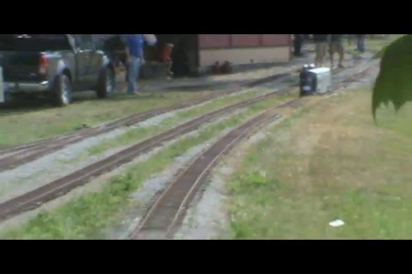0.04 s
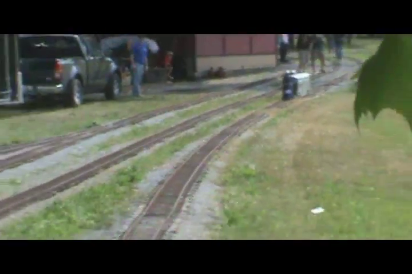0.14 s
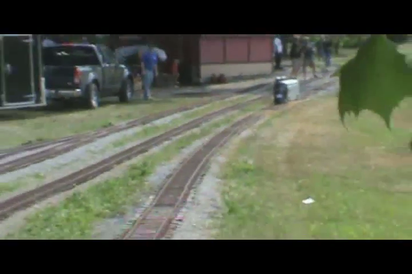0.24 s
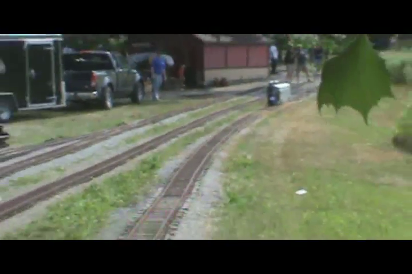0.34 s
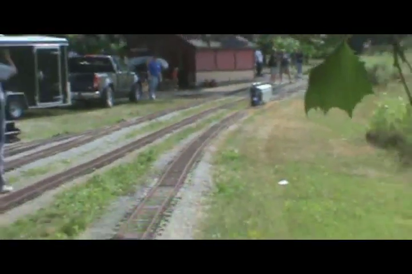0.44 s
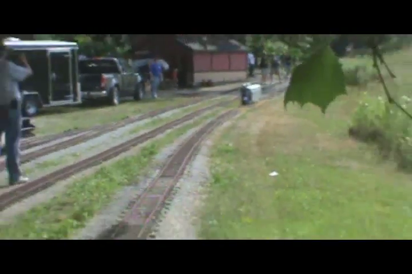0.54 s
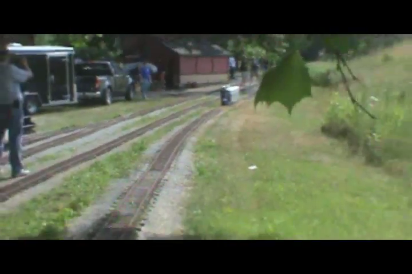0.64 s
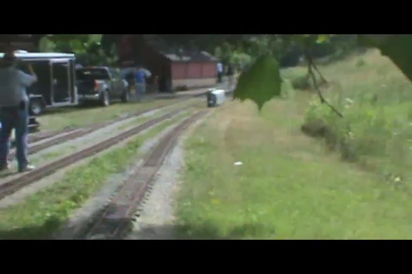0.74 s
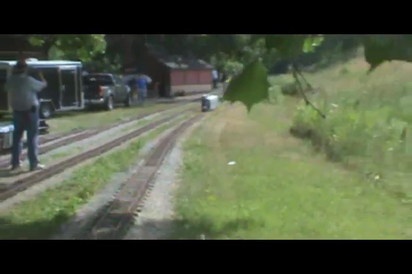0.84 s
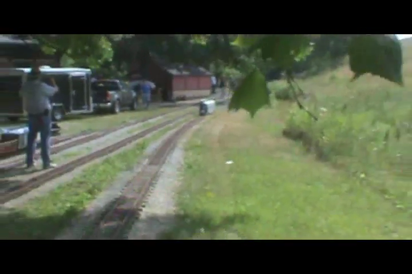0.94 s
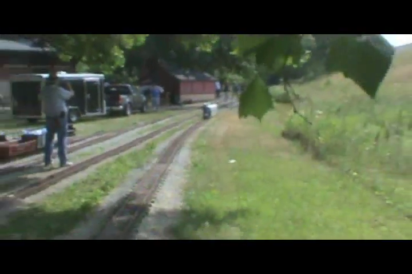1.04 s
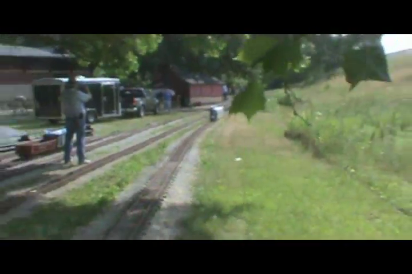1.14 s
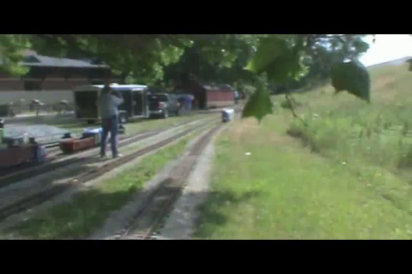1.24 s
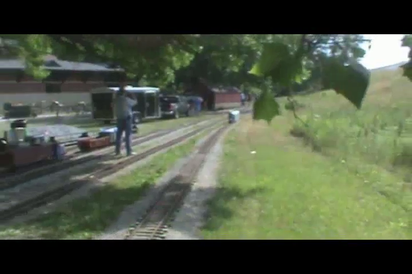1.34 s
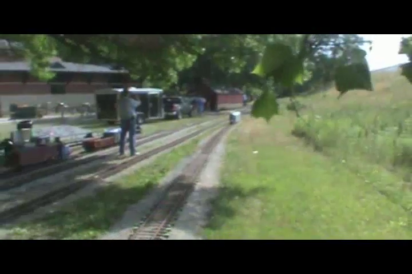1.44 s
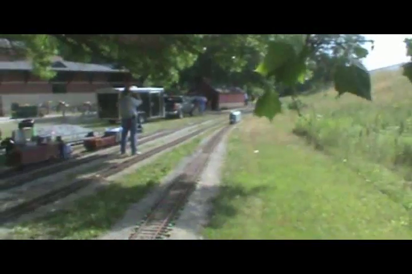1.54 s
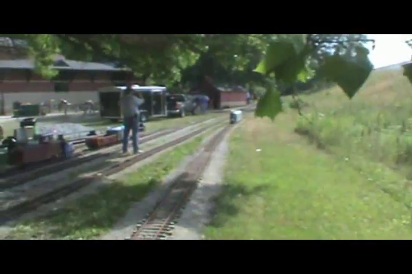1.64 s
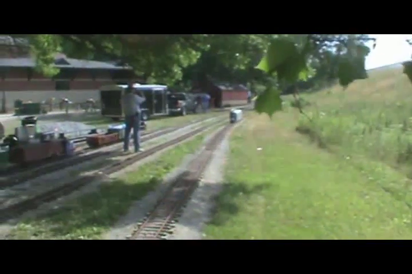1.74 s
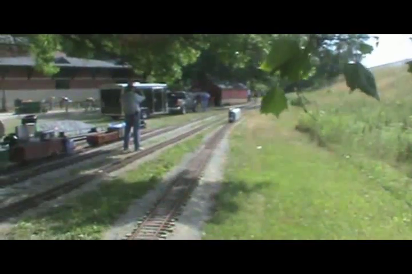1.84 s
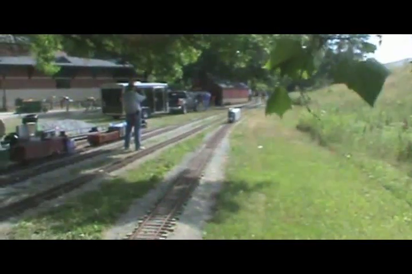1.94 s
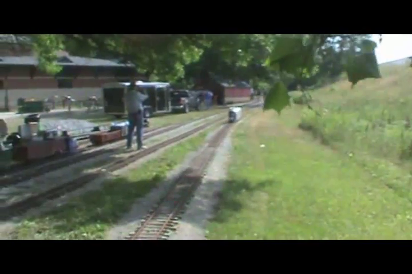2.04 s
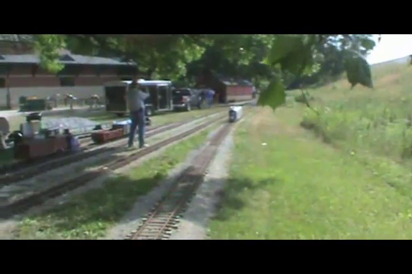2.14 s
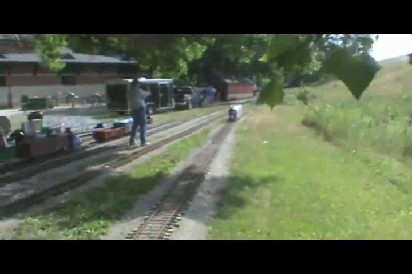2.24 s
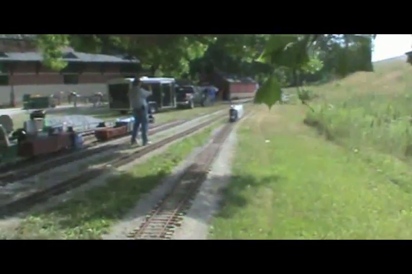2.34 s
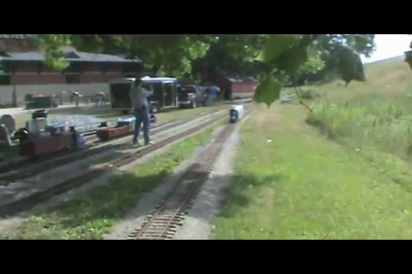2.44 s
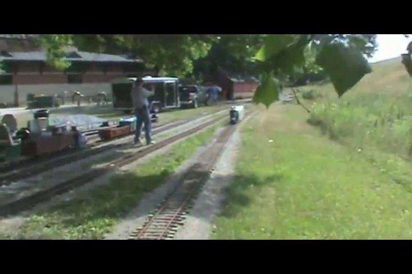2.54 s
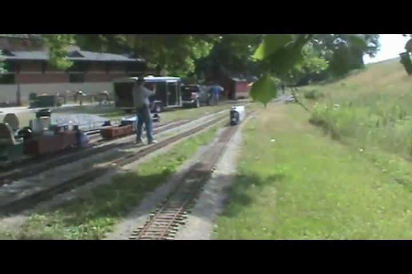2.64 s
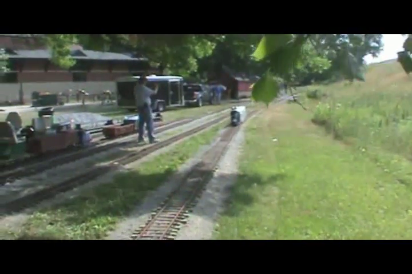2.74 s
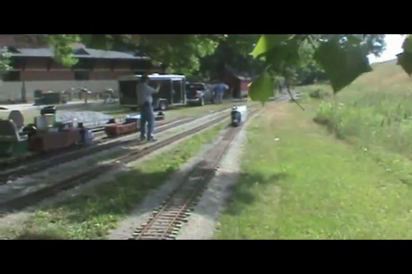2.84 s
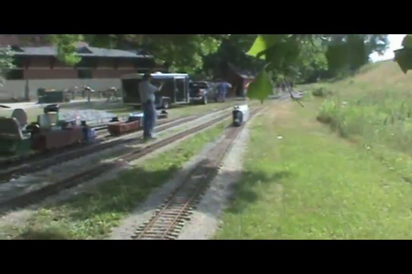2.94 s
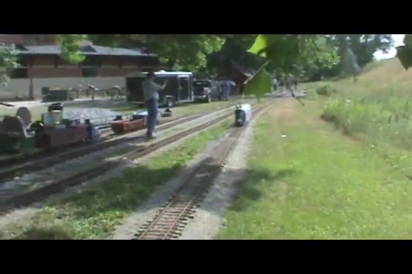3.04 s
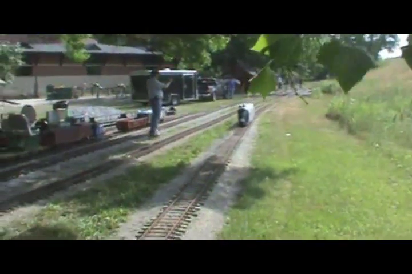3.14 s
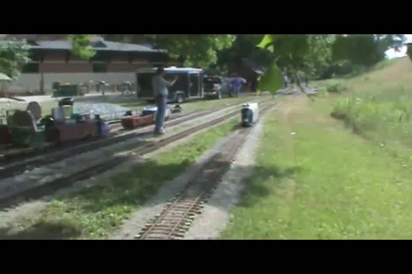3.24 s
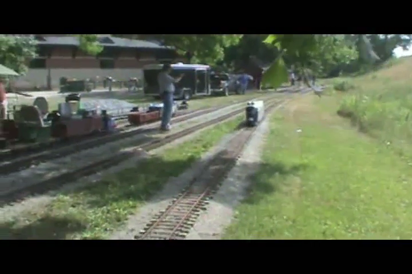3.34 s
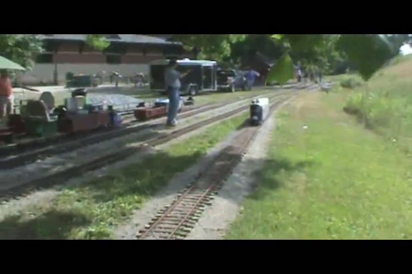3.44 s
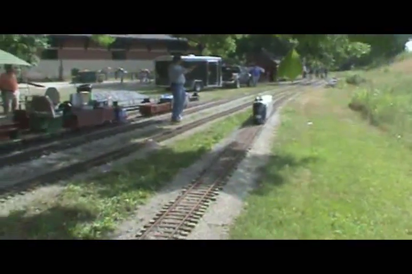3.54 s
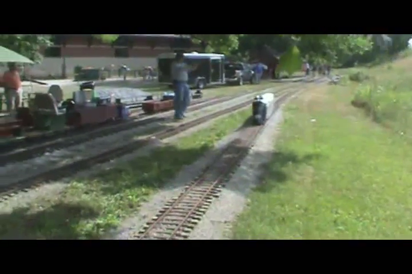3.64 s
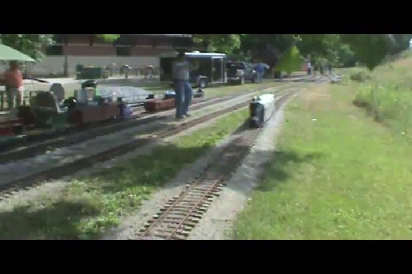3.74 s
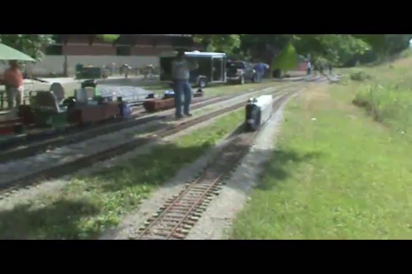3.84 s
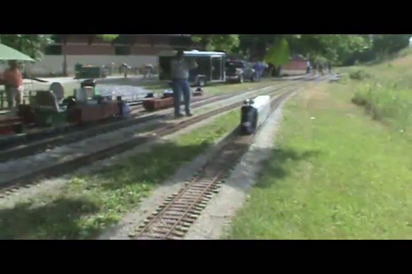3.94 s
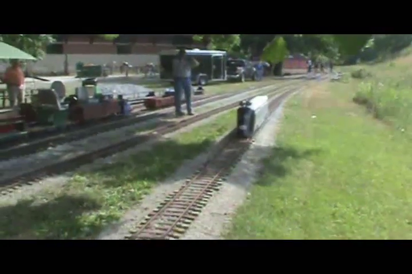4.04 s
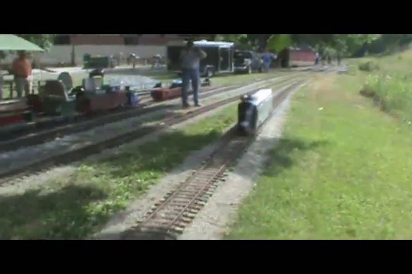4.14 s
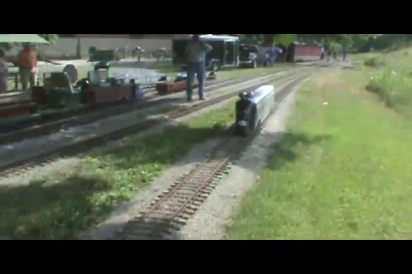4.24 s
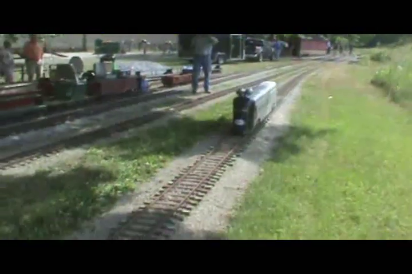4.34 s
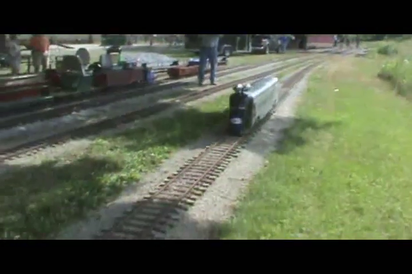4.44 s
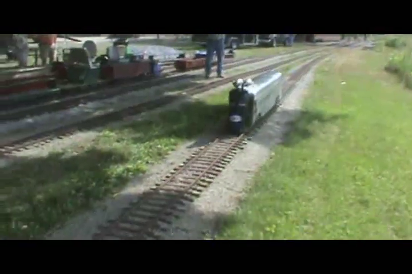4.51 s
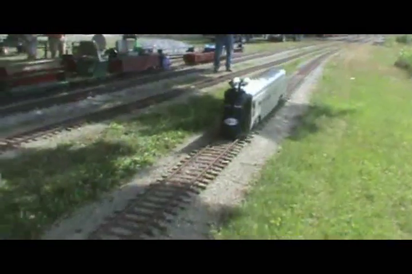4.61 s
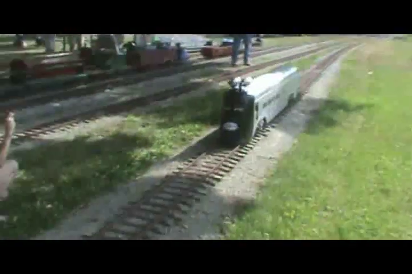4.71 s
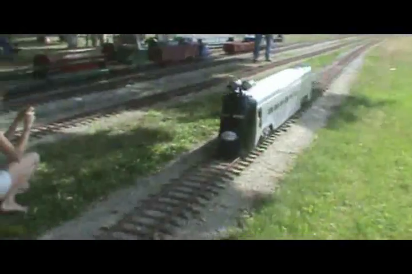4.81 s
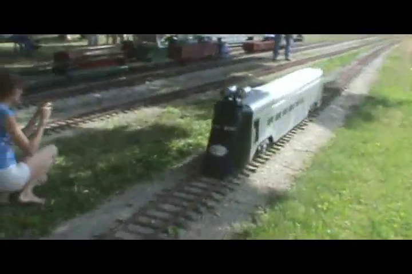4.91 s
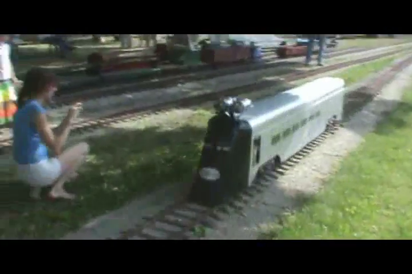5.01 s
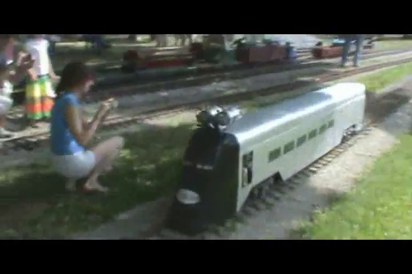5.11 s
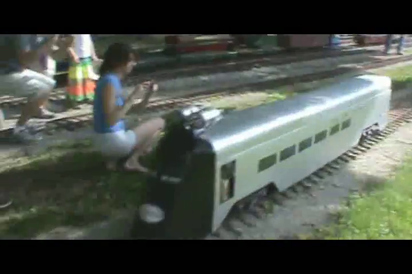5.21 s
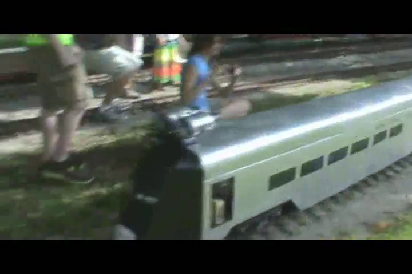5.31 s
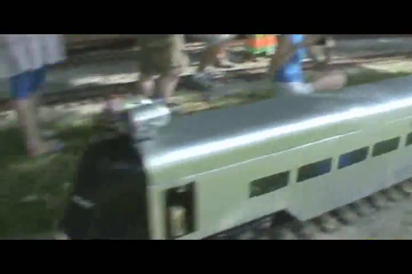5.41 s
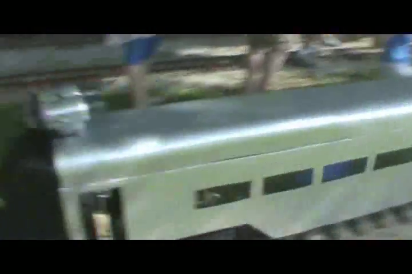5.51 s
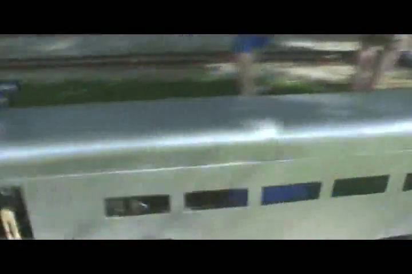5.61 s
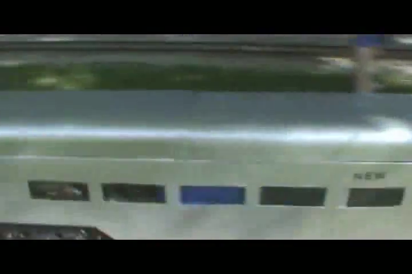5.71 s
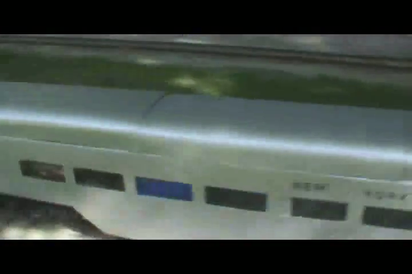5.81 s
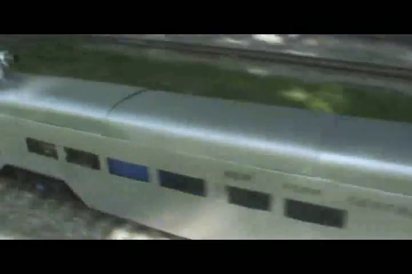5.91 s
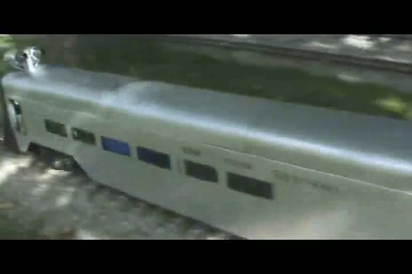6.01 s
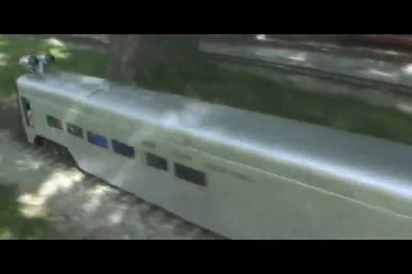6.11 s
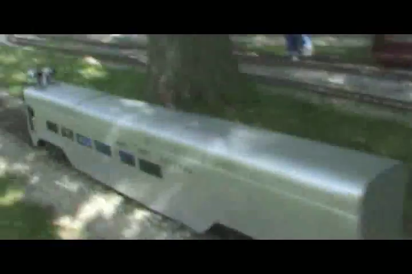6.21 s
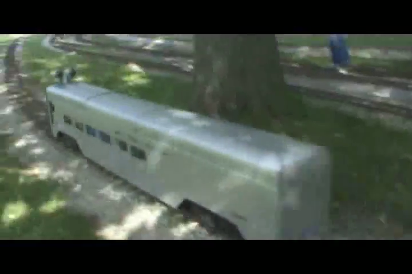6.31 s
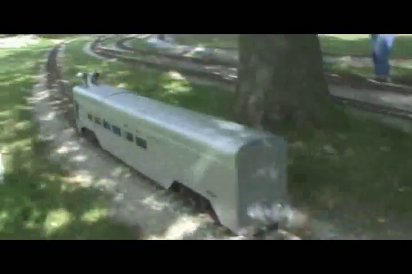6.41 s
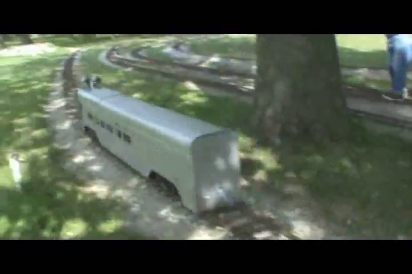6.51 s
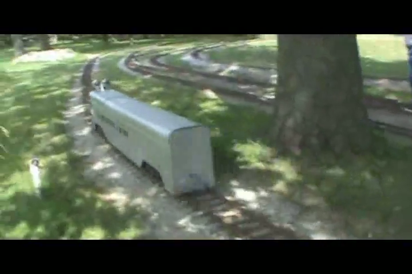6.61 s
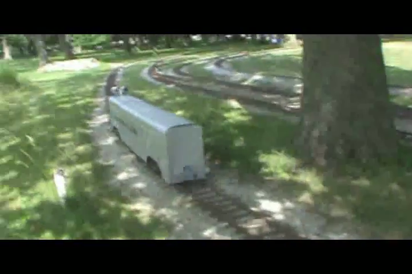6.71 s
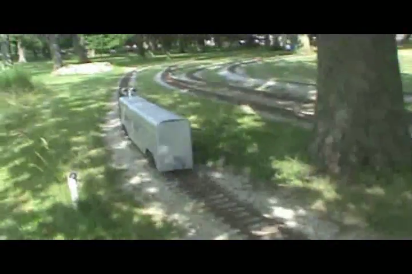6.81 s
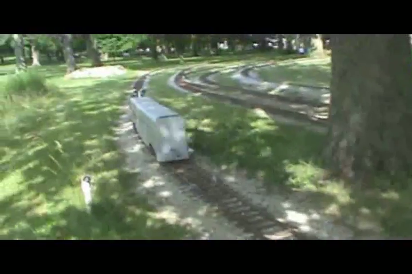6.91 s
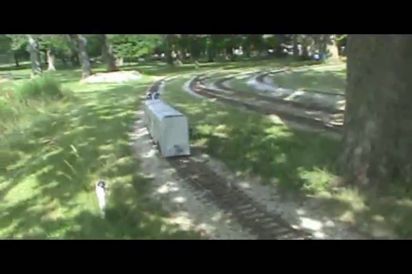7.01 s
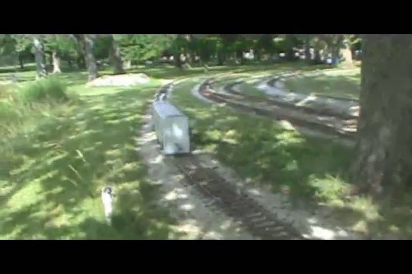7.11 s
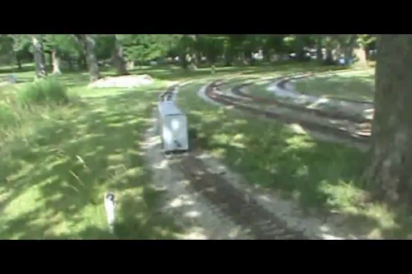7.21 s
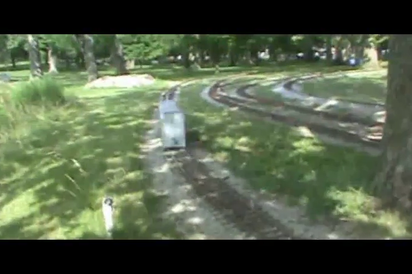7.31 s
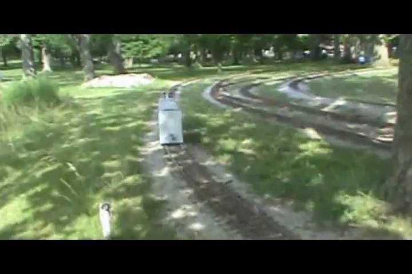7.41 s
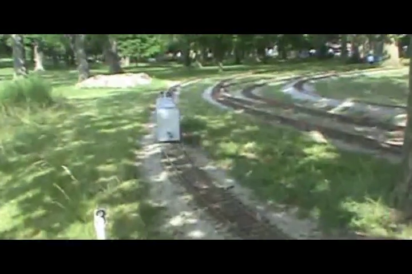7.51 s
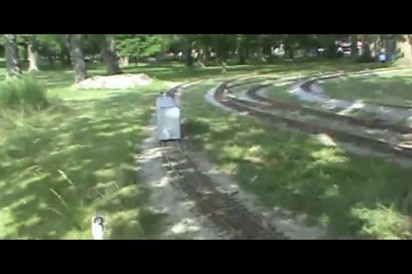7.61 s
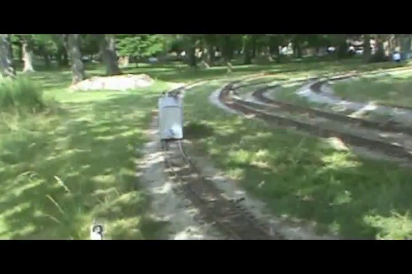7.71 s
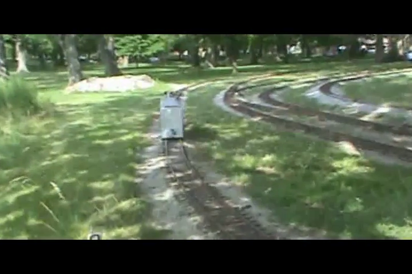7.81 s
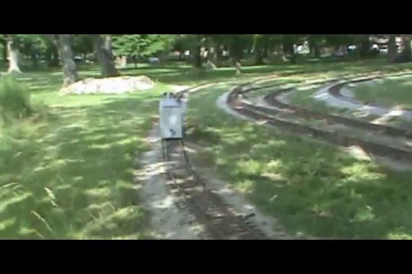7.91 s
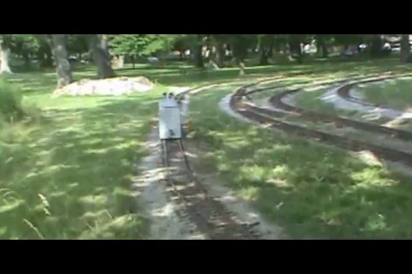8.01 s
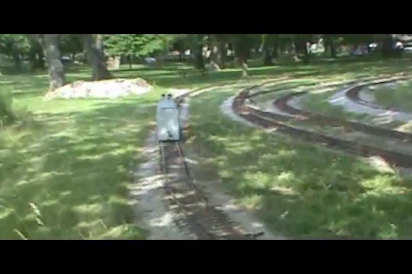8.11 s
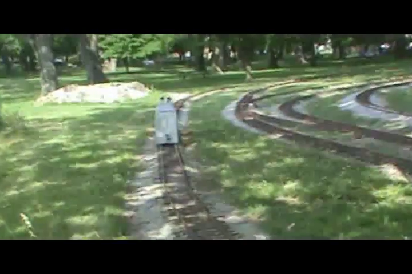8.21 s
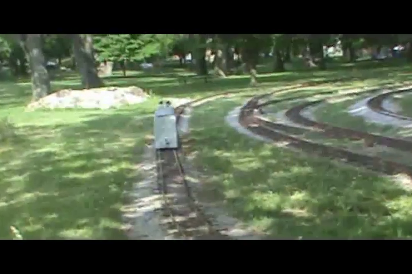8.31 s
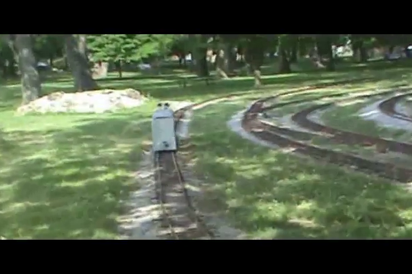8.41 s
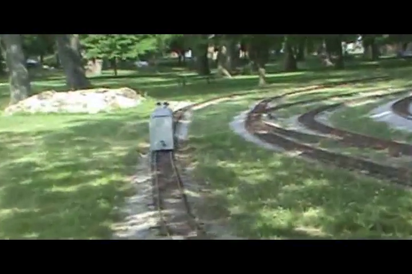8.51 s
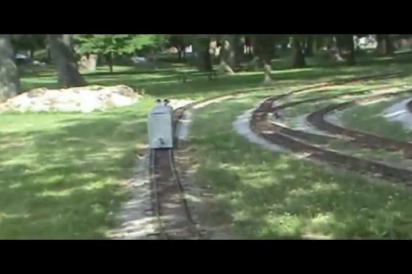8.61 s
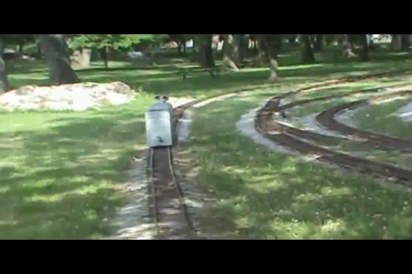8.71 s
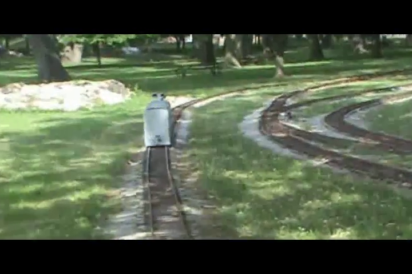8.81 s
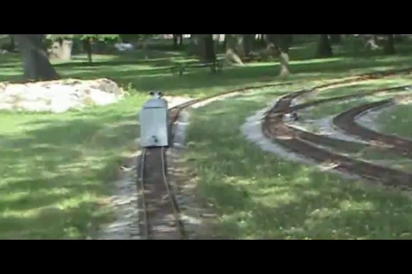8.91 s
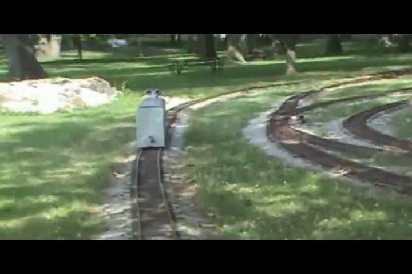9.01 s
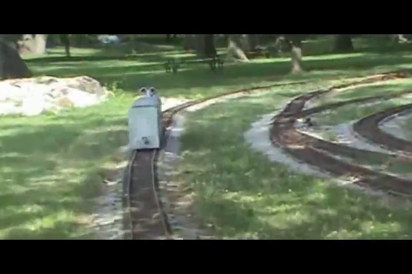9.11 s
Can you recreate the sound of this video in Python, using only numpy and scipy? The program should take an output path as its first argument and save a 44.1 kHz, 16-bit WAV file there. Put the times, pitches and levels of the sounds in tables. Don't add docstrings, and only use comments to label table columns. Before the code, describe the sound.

Outdoors in a park, a handheld stereo microphone catches a small jet-powered model train. From 0 s two piercing whines around 8.4 kHz waver and beat, with bright gritty hiss, a narrow hollow howl near half their pitch, and fluttering treble. Low wind gusts thump the microphone, strongest from 0.5 to 1 s, with scattered puffs until about 4 s. The howl and airy rush swell near 2 s; tree echoes blur the whine. From 4.5 s the train closes in, wind nearly gone. A dull wheel knock comes at 5.5 s; at about 5.9 s the rush is loudest, treble to the left, with a low body boom and a downward-sliding whoosh as the whine drops slightly. After 6.3 s it darkens to breathy tail rush and hoot, fading steadily. Small rail knocks sound near 7.1, 7.4 and 8.9 s over faint low murmur, until 9.15 s.

```python
import sys
import numpy as np
from scipy import signal
from scipy.fft import rfft, irfft, next_fast_len
from scipy.io import wavfile
from scipy.ndimage import uniform_filter1d, map_coordinates

SR = 44100
rng = np.random.default_rng(int(sys.argv[2]) if len(sys.argv) > 2 else 0)


def how_loud(loudness_db):
    steps = np.asarray(loudness_db, float) / 20
    return 10 ** steps


def file_out(sig):
    cols = np.atleast_2d(sig).T
    lim = np.clip(cols, -1, 1)
    pcm = np.round(lim * 32767).astype(np.int16)
    wavfile.write(sys.argv[1], SR, pcm)


N = 403515


def unit(x):
    return x / np.sqrt(np.mean(np.abs(x) ** 2) + 1e-20)


def seconds():
    return np.arange(N) / SR


def along(points, hz):
    f, v = np.transpose(points)
    return np.interp(np.log(hz + 1), np.log(f + 1), v)


def curves(rows):
    s, *cols = np.transpose(rows)
    return [np.interp(seconds(), s, c) for c in cols]


def wobble(rate_hz):
    at = np.arange(0, N + 64, 64)
    knots = rng.standard_normal(int(N * rate_hz / SR) + 4)
    return np.interp(np.arange(N), at, map_coordinates(knots, [at * rate_hz / SR]))


def bump(centre_s, half_s):
    return np.exp(-((seconds() - centre_s) / half_s) ** 2)


def filtered(x, response):
    m = next_fast_len(N + 8192)
    return irfft(rfft(x, m) * response(np.fft.rfftfreq(m, 1 / SR)), m)[..., :N]


def cycles(hz):
    return np.exp(2j * np.pi * np.cumsum(hz) / SR)


def band(width_hz, order):
    place = np.cumsum(width_hz) / SR * 8
    size = int(place[-1]) + 8
    shape = 1 / np.sqrt(1 + (np.fft.fftfreq(size) * 16) ** order)
    noise = rng.standard_normal((2, size)) + 1j * rng.standard_normal((2, size))
    seeds = np.fft.ifft(shape * noise)
    return unit(np.array([np.interp(place, np.arange(size), s) for s in seeds]))


def stereo(pair, alike):
    turn = np.arccos(np.clip(alike, -1, 1)) / 2
    mid, side = np.cos(turn) * pair[0], np.sin(turn) * pair[1]
    return np.array([mid + side, mid - side])


def sides(pan_db):
    g = how_loud(np.array([pan_db / 2, -pan_db / 2]))
    return g / np.sqrt(np.mean(g ** 2, axis=0))


# start_s, heading (0 nose, 1 flank, 2 tail), treble_left_right_db
PATH = [(0, 0.12, 0.5), (2, 0, 0.5), (3.3, 0.27, 0.5), (4.5, 0.15, -1.5), (5.2, 0.31, -2.5), (5.5, .8, 1.5),
        (5.8, 1, 10), (6.2, 0.93, 5), (6.65, 1.25, 2.5), (7, 1.903, 0.5), (9.15, 2.05, -1.5)]


def path():
    return curves(PATH)


# start_s, pitch_hz
UPPER = [(0, 8535), (.29, 8588), (.55, 8540), (1.3, 8390), (1.42, 8412), (2.1, 8506), (2.3, 8558),
         (2.72, 8622), (2.97, 8572), (3.28, 8445), (3.55, 8412), (4.0, 8473), (4.52, 8567), (4.9, 8500),
         (5.3, 8375), (5.9, 8268), (6.0, 8293)]
LOWER = [(1.2, 8398), (1.52, 8352), (2.02, 8480), (2.42, 8549), (2.73, 8552), (3.2, 8447), (3.82, 8340),
         (4.02, 8372), (4.47, 8495), (4.78, 8468), (5.27, 8372), (5.72, 8226), (5.92, 8224), (6.36, 8312),
         (7.4, 8115), (7.8, 8070), (8.5, 8266), (9.15, 8192)]
EARLY = [(0, 8421), (.42, 8483), (.55, 8448), (.85, 8302), (1.1, 8255)]
SPOOL_S = .06


def spool(rows):
    return uniform_filter1d(curves(rows)[0], size=round(SPOOL_S * SR), mode="nearest")


# start_s, exhaust_roar_db (nearness), intake_hiss_db
JET = [(0, -43, -30), (.8, -38, -29.5), (1.27, -41, -24.5), (1.4, -44.5, -27), (1.68, -41, -21.5),
       (1.94, -39.5, -30.5), (2.3, -39.5, -30.5), (2.6, -40, -27), (3.74, -38, -25), (4.28, -35.5, -26.5),
       (4.46, -38, -29.5), (4.92, -39, -30), (5.35, -35, -30.5), (5.52, -29.5, -33.5), (5.9, -25.5, -27),
       (6.12, -28.5, -29.5), (7.0, -40.5, -41.5), (9.15, -48.5, -48)]
# centre_s, half_length_s, level_db
SHADES = [(0.203, 0.19, -10), (0.717, 0.12, -10.5), (1.428, 0.28, -6), (1.654, 0.24, -12), (1.944, 0.19, 6),
          (3.19, 0.24, -5), (3.76, 0.3, -5.5), (5.127, 0.053, -5), (5.627, 0.053, -2), (5.867, .08, 4),
          (6.12, 0.28, -7.5), (6.5, 0.25, -3.5)]
RUSH_DB = (2.5, 1, 5)
FIELD_S, FIELD_HALF_S, FIELD_DB = 2.26, .55, 6
TOP_DB = -0.15
FAR_DB, AIR_LOSS_DB_PER_DB = -29, 0.53
SHADE_HISS, SHADE_RUSH = 0.12, 0.039


def layers():
    roar_db, hiss_db = curves(JET)
    shade_db = sum(db * bump(s, half_s) for s, half_s, db in SHADES)
    turned_db = np.interp(path()[0], range(3), RUSH_DB) + FIELD_DB * bump(FIELD_S, FIELD_HALF_S)
    rush_db = (roar_db + hiss_db) / 2 + turned_db + SHADE_RUSH * shade_db
    air_db = AIR_LOSS_DB_PER_DB * np.minimum(hiss_db - FAR_DB, 0)
    top_db = hiss_db + TOP_DB + air_db + shade_db
    return roar_db, rush_db, hiss_db + SHADE_HISS * shade_db, top_db


PASS_S, PASS_TAKES_S, ECHO_LAG_S = 5.55, .55, .13
ECHO_AHEAD_HZ, ECHO_BEHIND_HZ = -115, 150
SPREAD_AHEAD_HZ, SPREAD_BEHIND_HZ, SPREAD_PER_GAP = 180, 305, 1.2


def scatter():
    t = seconds()
    passed = np.clip(path()[0], 0, 1)
    upper_hz, lower_hz = spool(UPPER), spool(LOWER)
    gone = np.clip((t - PASS_S) / PASS_TAKES_S, 0, 1)
    late_hz = np.interp(t - ECHO_LAG_S, t, lower_hz)
    behind_mid_hz = (lower_hz + late_hz) / 2 + ECHO_BEHIND_HZ
    mid_hz = (1 - gone) * (upper_hz + ECHO_AHEAD_HZ) + gone * behind_mid_hz
    gap_hz = abs(upper_hz - lower_hz) * (t > LOWER[0][0])
    ahead_hz = SPREAD_AHEAD_HZ + SPREAD_PER_GAP * gap_hz
    behind_hz = SPREAD_BEHIND_HZ + late_hz - lower_hz
    return passed, mid_hz, (1 - gone) * ahead_hz + gone * behind_hz


# start_s, upper_db, lower_db
WHINE = [(0, -33, -25), (.3, -35, -39), (.5, -30.5, -19.5), (.9, -27, -30.5), (1.3, -28, -18.5),
         (1.55, -34, -23), (1.9, -24, -26), (2.2, -31, -23), (2.8, -24.5, -20.5), (3.6, -24, -23),
         (4.0, -25, -23), (4.5, -24.5, -18), (5.5, -23.5, -15), (5.9, -25, -28.5), (6.1, -36, -20.5),
         (6.4, -40, -32), (7.2, -51, -38.5), (9.15, -40, -46)]
MIRROR_START_S, MIRROR_END_S, MIRROR_FACTOR, MIRROR_DB = .85, 1.02, .9878, -2
OVERTONE_DB, UNDERTONE_DB = -12.5, -19


def whine():
    out, t = np.zeros((2, N)), seconds()
    _, _, hiss_db, top_db = layers()
    pan_db = path()[1]
    upper_db, lower_db = curves(WHINE)
    tones = [(spool(rows), db, rows[0][0], rows[-1][0])
             for rows, db in ((UPPER, upper_db), (LOWER, lower_db), (EARLY, lower_db))]
    tones.append((MIRROR_FACTOR * tones[0][0], upper_db + MIRROR_DB, MIRROR_START_S, MIRROR_END_S))
    for hz, db, start_s, end_s in tones:
        fade_in = np.clip((t - start_s + 0.1) / 0.034, 0, 1)
        heard = fade_in * np.clip((end_s + 0.04 - t) / 0.035, 0, 1)
        half_turn = np.pi * np.cumsum(hz + 3 * wobble(30)) / SR
        fade = how_loud(db + 3.5 + 1.2 * wobble(25) + 1.9 * wobble(11)) * heard
        ports = np.array([1, -1])[:, None] * (0.084 + 0.52 * wobble(3.8))
        out += fade * sides(pan_db + 1.4 * wobble(5.2)) * np.sin(2 * half_turn + ports)
        out += heard * how_loud(top_db + OVERTONE_DB + 4.3 * wobble(5.4)) * np.sin(3 * half_turn)
        out += heard * how_loud(hiss_db + UNDERTONE_DB + 4 * wobble(2.92)) * np.sin(half_turn)
    return out


ECHO_DB, ECHO_OVER_ROAR_DB = -29.5, 5


def echoes():
    heading, pan_db = path()
    passed, mid_hz, spread_hz = scatter()
    behind_db = np.minimum(ECHO_DB, layers()[0] + ECHO_OVER_ROAR_DB)
    db = np.where(heading > 1, behind_db, ECHO_DB)
    soft = band(.7 * spread_hz, order=4) * cycles(0.12 * spread_hz)
    sharp = band(spread_hz, order=24)
    pair = np.sqrt(1 - passed) * soft + np.sqrt(passed) * sharp
    smear = stereo(pair, 0.47) * cycles(mid_hz)
    return how_loud(db + 6.5 + 0.68 * wobble(23)) * sides(1.3 * pan_db) * smear.real


# start_s, level_db
HOWL = [(0, -28), (.62, -32), (.72, -26.5), (1.88, -20.5), (2.1, -24), (2.37, -32), (3.1, -29), (3.3, -27),
        (3.56, -29), (4.3, -27), (4.4, -29.5), (5.5, -37), (6.8, -46), (9.15, -54.5)]
HOWL_RATIO, HOWL_BEHIND_HZ = .536, 4500


def howl():
    heading, pan_db = path()
    howl_db = curves(HOWL)[0] + 1.8 * wobble(7.8)
    mid_hz = scatter()[1]
    _, rush_db, _, top_db = layers()
    duct_hz = np.where(heading > 1, HOWL_BEHIND_HZ, HOWL_RATIO * spool(UPPER))
    duct = stereo(band(np.full(N, 65.), order=2), 0.97) * cycles(duct_hz)
    blade = cycles(mid_hz + 70)
    total = how_loud(top_db - 10) * duct * blade
    difference = how_loud(howl_db - 10.5) * np.conj(duct) * blade
    pipe = stereo(band(np.full(N, 230.), order=4), 0.69) * cycles(.36 * mid_hz)
    hoot = np.clip(heading - 1, 0, 1) * how_loud(rush_db - 5.0 + .9 * wobble(3.6)) * pipe
    direct = how_loud(howl_db + 1.5 + 0.83 * wobble(12)) * duct
    return sides(.3 * pan_db) * (direct + total + difference + hoot).real


# pitch_hz, likeness
ALIKE = [(100, 0.68), (300, 0.73), (640, 0.89), (1400, 0.62), (3000, 0.65), (7000, 0.59), (14000, 0.87)]


def rush(spectrum, patchy_db, comb_db):
    z = signal.stft(rng.standard_normal((2, N + 8192)), nperseg=1024)[2]

    def field(bins, frames):
        smooth = uniform_filter1d(rng.standard_normal(z.shape[1:]), size=bins, axis=0)
        return unit(uniform_filter1d(smooth, size=frames, axis=1))

    gain = how_loud(patchy_db * field(20, 5) + comb_db * field(3, 40))
    pair = signal.istft(z * gain, nperseg=1024)[1][:, :N]
    m = next_fast_len(N)
    hz = np.fft.rfftfreq(m, 1 / SR)
    return hz, m, stereo(rfft(pair, m), along(ALIKE, hz)) * how_loud(along(spectrum, hz))


# pitch_hz, level_db_per_hz
NOSE = [(120, -33.5), (400, -20.5), (630, -10.5), (1650, -26), (2470, -17.5), (3150, -18.5), (3580, -20.5),
        (4600, -7), (5600, -5.5), (6960, -14), (8500, -14.5), (10500, -22.5), (13200, -27.5), (15500, -48)]
FLANK = [(60, -30), (110, -9), (180, -17.5), (320, -10), (480, -13), (640, -4), (800, 0), (1000, -5),
         (1300, -16), (1600, -15.5), (2520, -18), (4460, -6.5), (6950, -20), (12300, -19.5), (15500, -32.5)]
TAIL = [(70, -21.5), (180, -5), (380, -20.5), (520, -6), (800, -7), (1300, -15), (2300, -11), (2990, -8.5),
        (3400, -16), (4540, -12.5), (6000, -19.5), (7200, -31), (12500, -38), (15500, -58)]
EDGES = [1200, 3500, 8300]
LEANS = (0, .15, .5, .6)
# start_s, factor
SLIDE = [(0, 1.037), (5.6, 1.037), (6.0, 1.047), (6.3, .93), (6.7, .85), (9.15, 0.77)]


def jet():
    heading, pan_db = path()
    slid = np.cumsum(curves(SLIDE)[0])
    out = np.zeros((2, N))
    gains = [how_loud(db) * sides(lean * pan_db) for db, lean in zip(layers(), LEANS)]
    for side, spectrum in enumerate((NOSE, FLANK, TAIL)):
        share = np.clip(1 - abs(heading - side), 0, 1)
        hz, m, noise = rush(spectrum, patchy_db=1.1, comb_db=2.1)
        below = [1 / (1 + (hz / edge_hz) ** 8) for edge_hz in EDGES]
        parts = np.diff([0 * hz, *below, 1 + 0 * hz], axis=0)
        for part, gain, lean in zip(parts, gains, LEANS):
            layer = irfft(noise * part, m)[:, :N]
            if side == 1 and lean < .5:
                layer = np.array([np.interp(slid, np.arange(N), c) for c in layer])
            out += np.sqrt(share) * gain * unit(layer)
    return out * how_loud(.8 * wobble(16))


# start_s, level_db
BREEZE = [(0, -31), (1.2, -37), (4.3, -45), (4.7, -58), (6.3, -62), (9.15, -53.5)]
# peak_s, peak_db, fall_db_per_s
GUSTS = [(0, -27.5, 60), (.18, -31, 122), (.5, -27.5, 50), (.64, -22.5, 55), (.81, -20.5, 118),
         (1.32, -33, 31), (1.81, -29, 110), (2.21, -31.5, 50), (2.37, -27, 57), (3.06, -29.5, 200),
         (3.36, -35, 25), (3.64, -34, 130), (3.95, -24.5, 200), (4.48, -41, 90), (4.77, -48, 60),
         (5.5, -38, 90), (5.83, -39, 110), (1.02, -32, 39), (2.8, -37.5, 3)]
GUST_RISE_DB_PER_S = 105


def gusts():
    t = seconds()
    peaks_db = [db - np.where(t < s, GUST_RISE_DB_PER_S * (s - t), fall * (t - s)) for s, db, fall in GUSTS]
    return how_loud(np.maximum(np.max(peaks_db, axis=0), curves(BREEZE)[0]))


# pitch_hz, level_db_per_hz
BUFFET = [(12, -39), (20, -11.5), (65, 0), (163, -2.5), (325, -15), (392, -18.5), (500, -28), (650, -58),
          (1100, -120)]


def wind():
    lumps = how_loud(2.4 * np.array([wobble(35), wobble(24)]))
    pair = filtered(rng.standard_normal((2, N)) * lumps, lambda hz: how_loud(along(BUFFET, hz)))

    def split(hz):
        alike = along([(30, 0.68), (80, 0.63), (200, 0.25)], hz)
        turn = np.arccos(np.clip(alike, -1, 1)) / 2
        return np.array([np.cos(turn), np.sin(turn)])

    mid, side = filtered(pair, split)
    return gusts() * unit(np.array([mid + side, mid - side]))


# pitch_hz, level_db_per_hz
PARK = [(40, -11), (100, -11.5), (180, -1), (300, -5.5), (400, -18), (700, -20), (1500, -35), (3000, -120)]


def park():
    air = filtered(rng.standard_normal((2, N)), lambda hz: how_loud(along(PARK, hz)))
    return how_loud(-50.0 + wobble(2.6)) * unit(stereo(air, 1.0))


# start_s, peak_db, ring_hz, t60_s
KNOCKS = [
    (5.488, -27.5, 440, 0.0099),
    (7.068, -28, 715, 0.01),
    (7.109, -22.5, 710, 0.0086),
    (7.119, -27, 650, 0.0099),
    (7.392, -30, 220, 0.016),
    (8.876, -23.5, 565, 0.0067),
]


def knocks():
    out, t = np.zeros(N + SR), np.arange(SR // 10) / SR
    for s, db, hz, t60_s in KNOCKS:
        rise = t / t60_s * 6
        swell = rise * np.exp(1 - rise)
        out[round(s * SR):][:len(t)] += how_loud(db) * swell * np.sin(2 * np.pi * hz * t)
    return out[:N] * how_loud(np.array([[-1.3], [1.3]]))


BOOM_S, BOOM_HALF_S, BOOM_HZ, BOOM_WIDE_HZ, BOOM_DB = 5.86, 0.21, 292, 229, -28
RIDGE_S, RIDGE_HALF_S, RIDGE_WIDE_HZ, RIDGE_DB = 6.08, 0.26, 330., -30.5
RIDGE_HZ, RIDGE_FALL_HZ_PER_S = 1620, 1300


def body():
    def swell(s, half_s, wide_hz):
        return bump(s, half_s) * stereo(band(np.full(N, wide_hz), order=4), 0.38)

    boom = how_loud(BOOM_DB) * swell(BOOM_S, BOOM_HALF_S, BOOM_WIDE_HZ) * cycles(np.full(N, BOOM_HZ))
    ridge_hz = RIDGE_HZ - RIDGE_FALL_HZ_PER_S * (seconds() - RIDGE_S)
    ridge = how_loud(RIDGE_DB) * swell(RIDGE_S, RIDGE_HALF_S, RIDGE_WIDE_HZ) * cycles(ridge_hz)
    return (boom + ridge).real


def scene():
    train = whine() + echoes() + howl() + jet()
    return train + wind() + park() + knocks() + body()


def band_limit(x):
    return signal.sosfilt(signal.butter(12, 15690, fs=SR, output="sos"), x)


# pitch_hz, left_right_db
LEAN = [(200, -.5), (600, -2.5), (1300, 0.5), (2400, -1.5), (4400, -3.5), (8000, 0.5)]


def record(dry):
    x = filtered(dry, lambda hz: how_loud(np.array([[.5], [-.5]]) * along(LEAN, hz)))
    mix = x / (1 + (x / .8) ** 4) ** (1 / 4)
    return band_limit(mix)


dry = scene()
out = record(dry)
file_out(out)
```